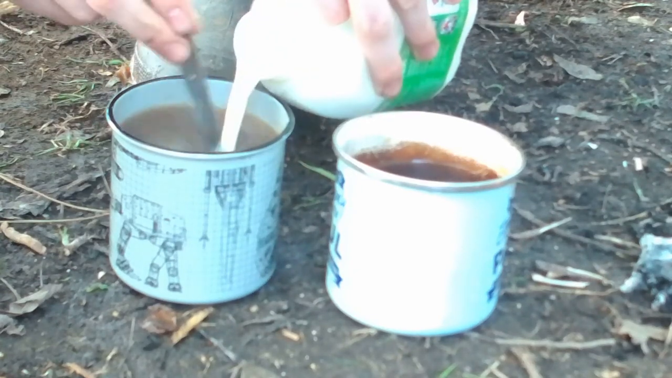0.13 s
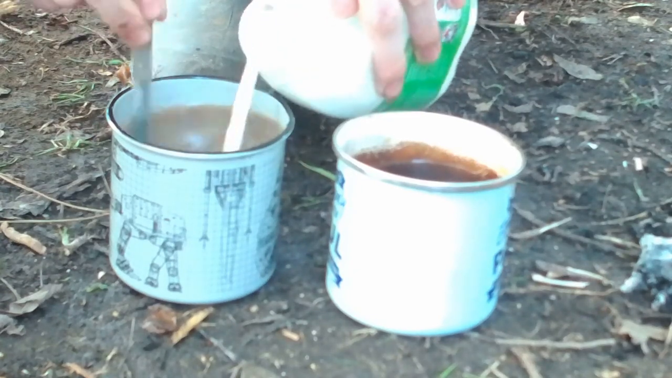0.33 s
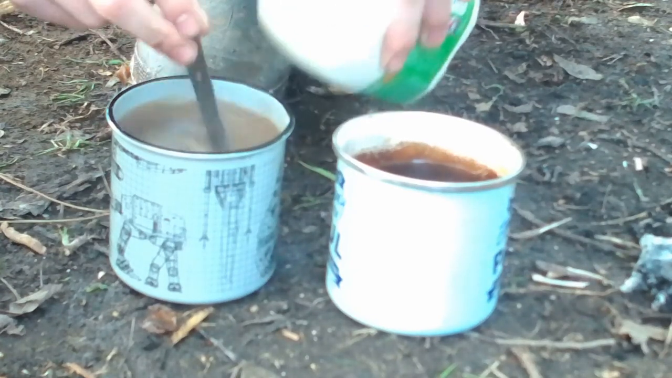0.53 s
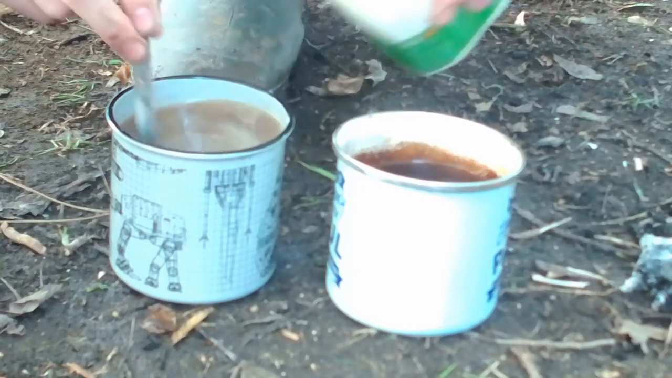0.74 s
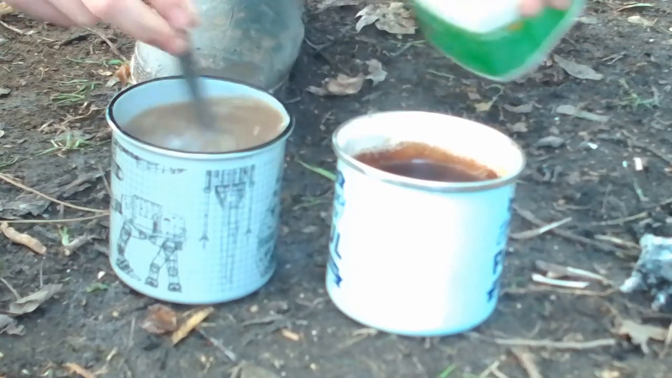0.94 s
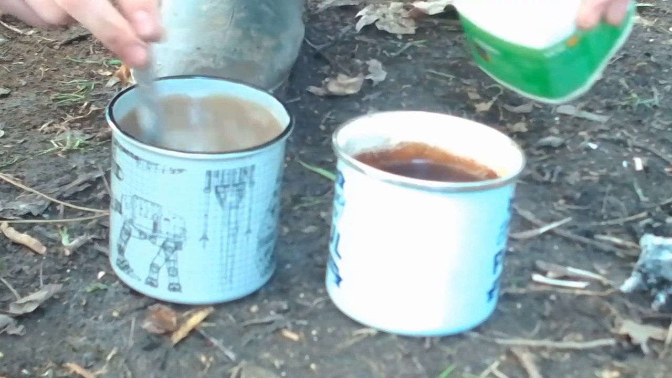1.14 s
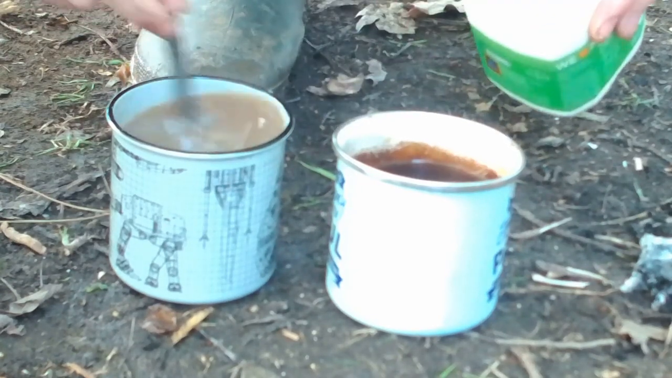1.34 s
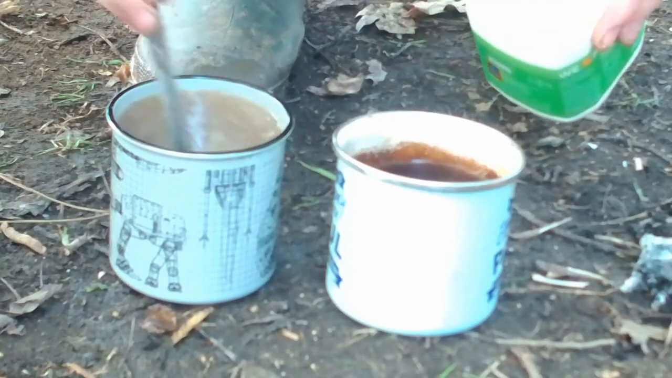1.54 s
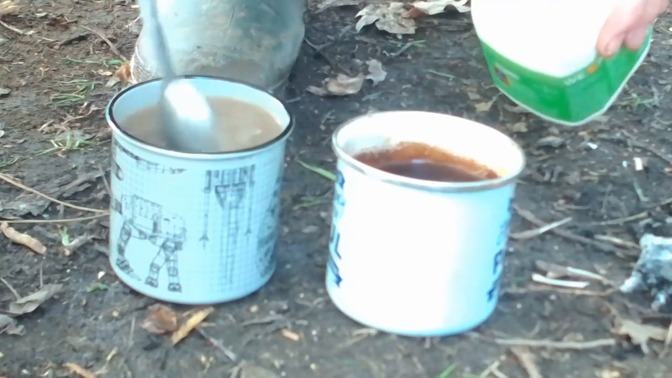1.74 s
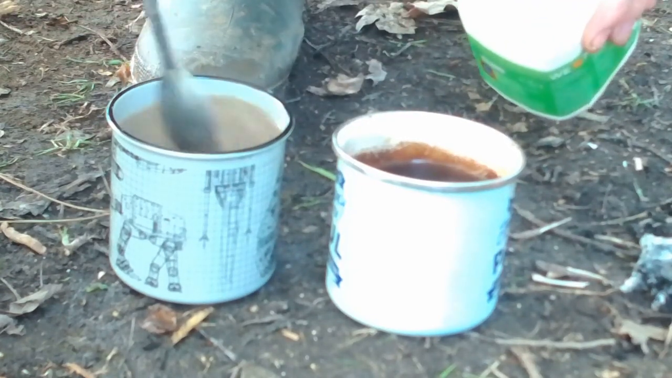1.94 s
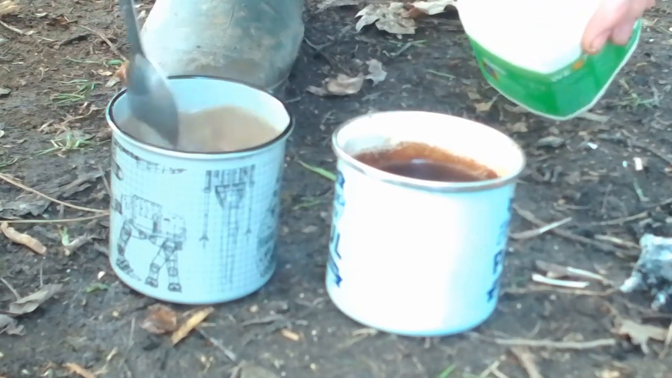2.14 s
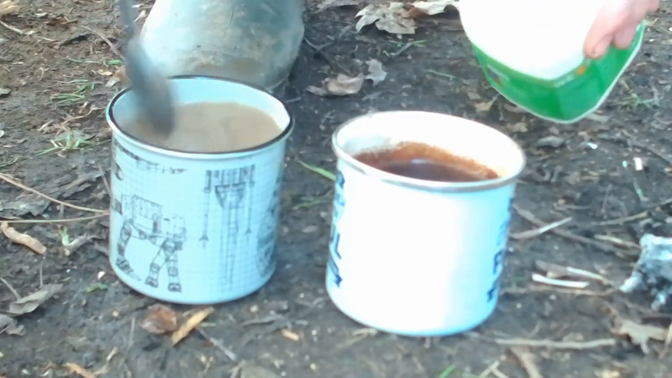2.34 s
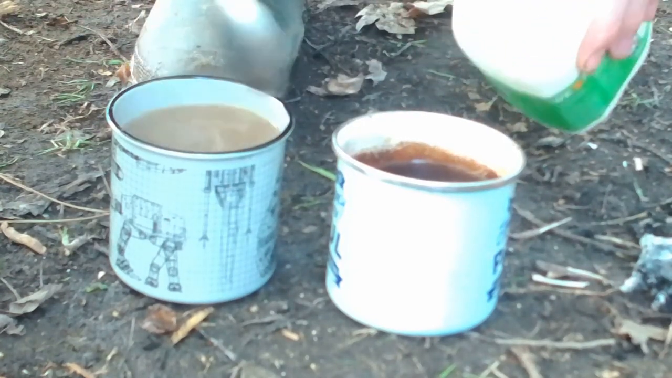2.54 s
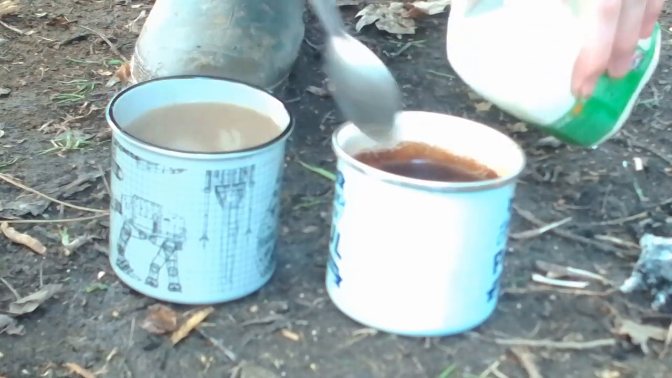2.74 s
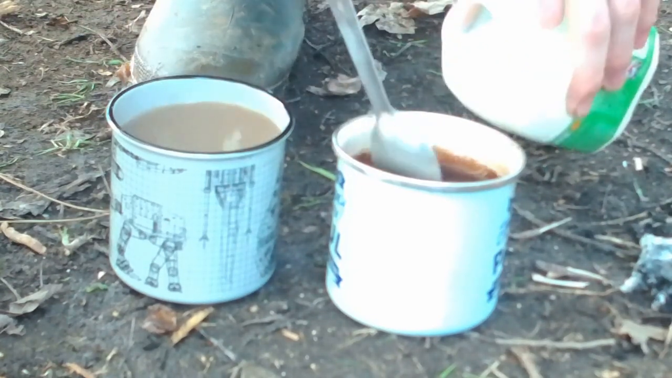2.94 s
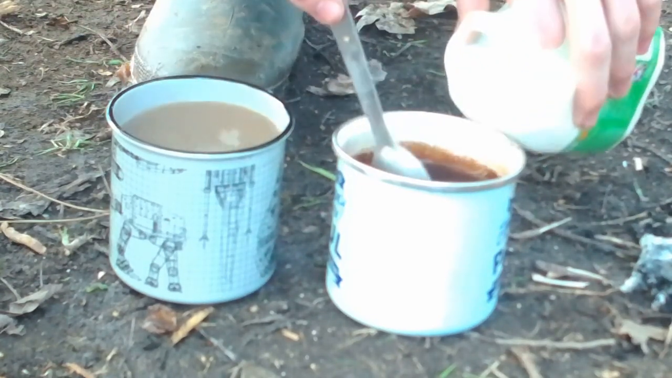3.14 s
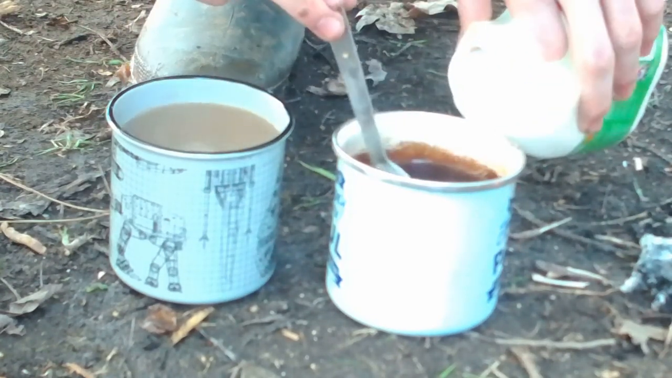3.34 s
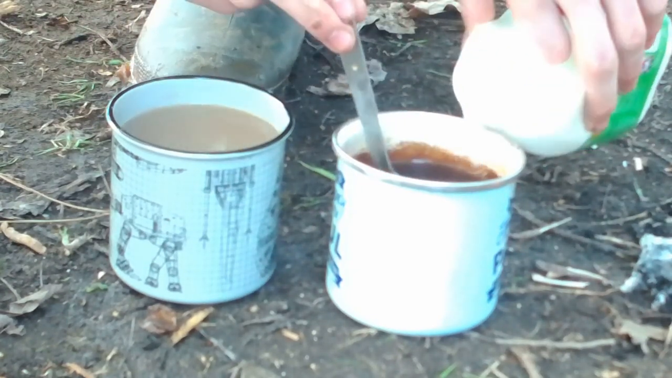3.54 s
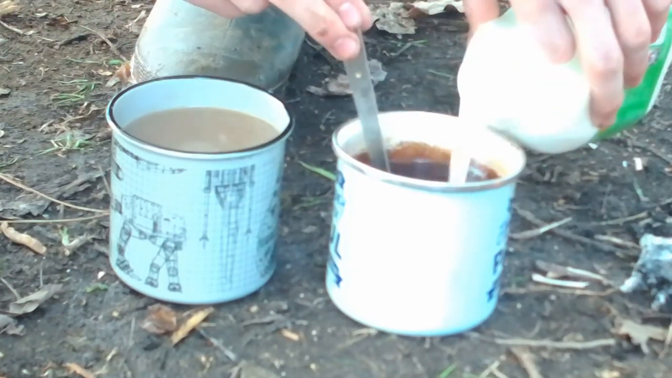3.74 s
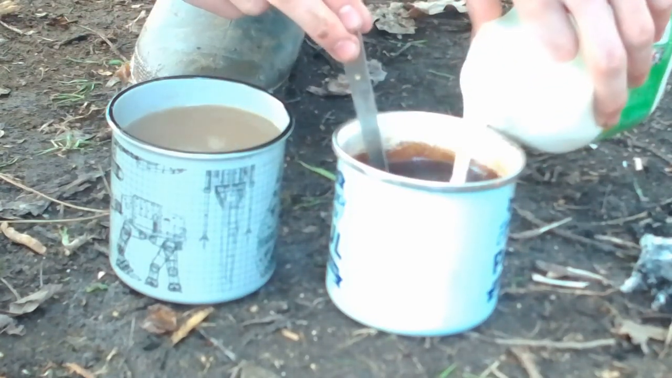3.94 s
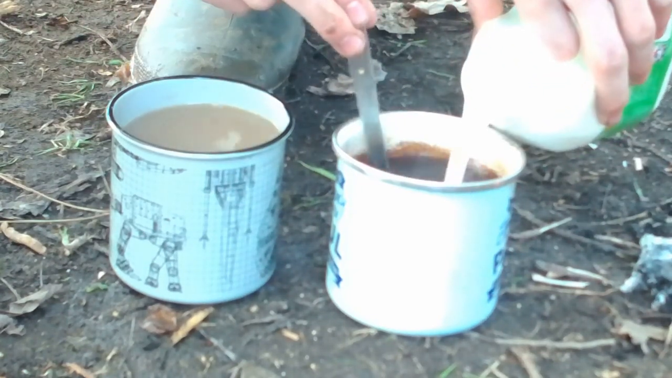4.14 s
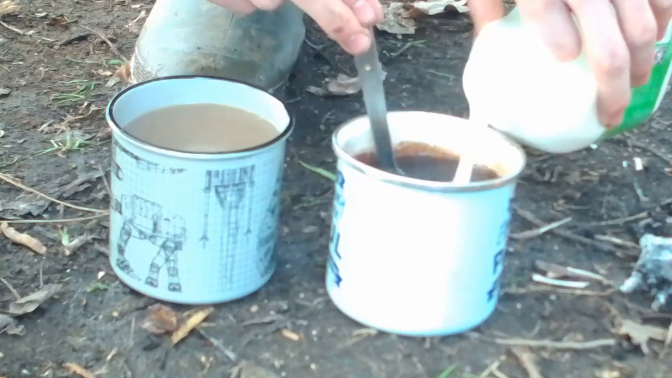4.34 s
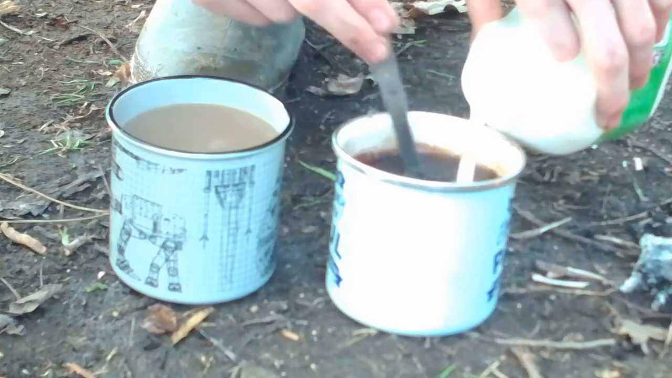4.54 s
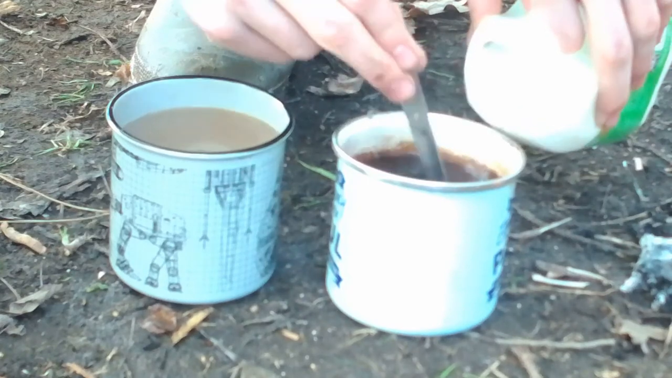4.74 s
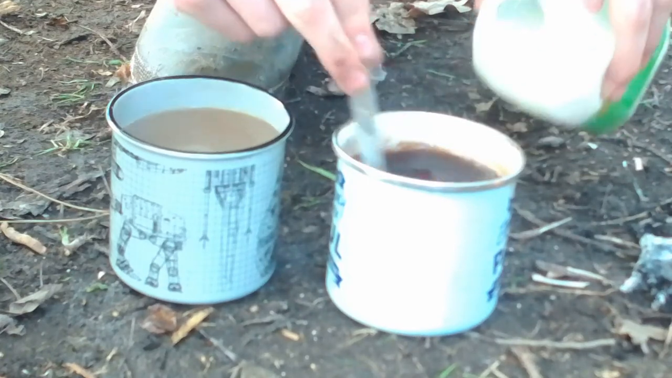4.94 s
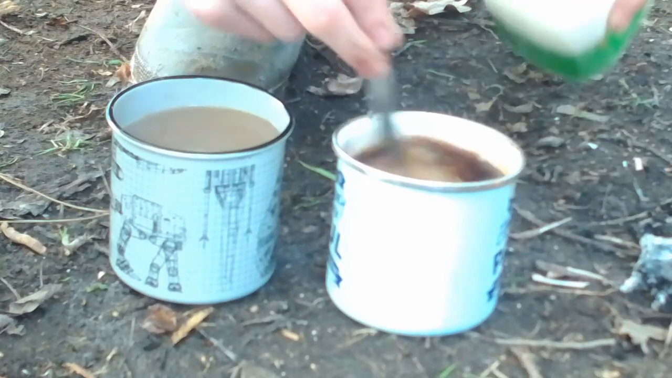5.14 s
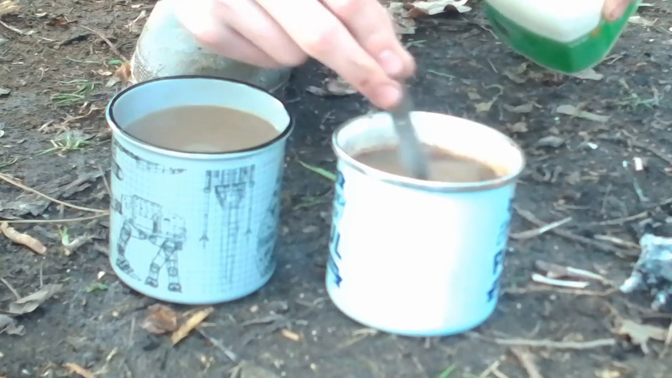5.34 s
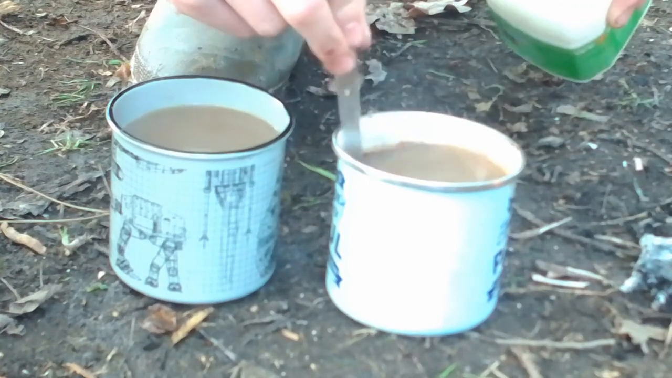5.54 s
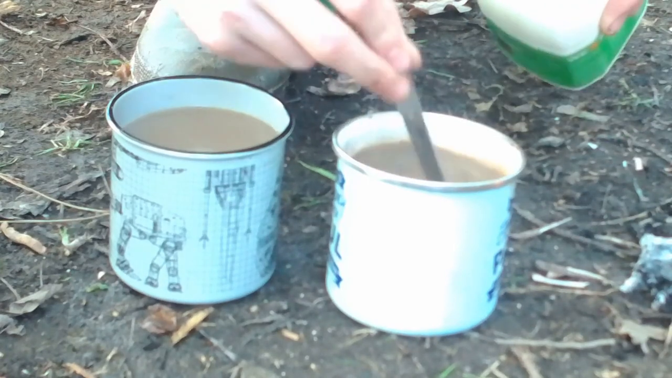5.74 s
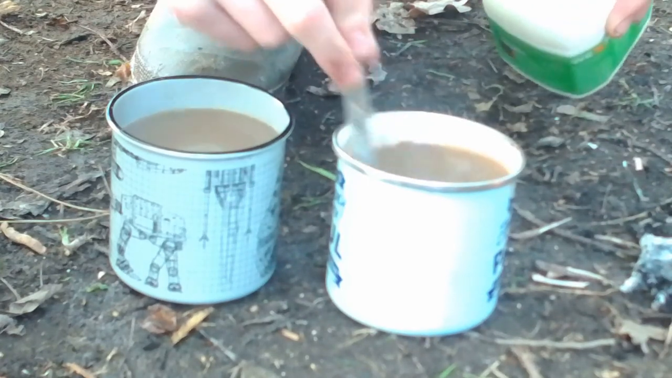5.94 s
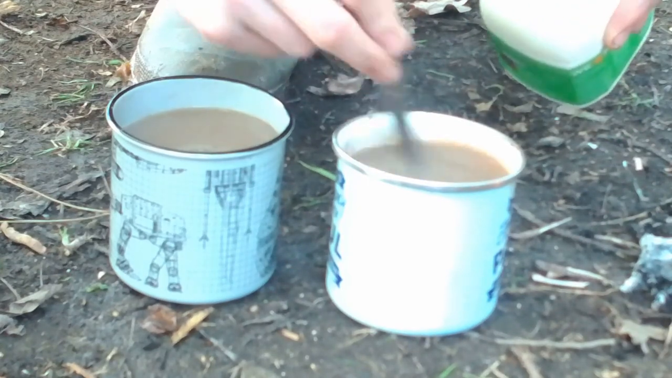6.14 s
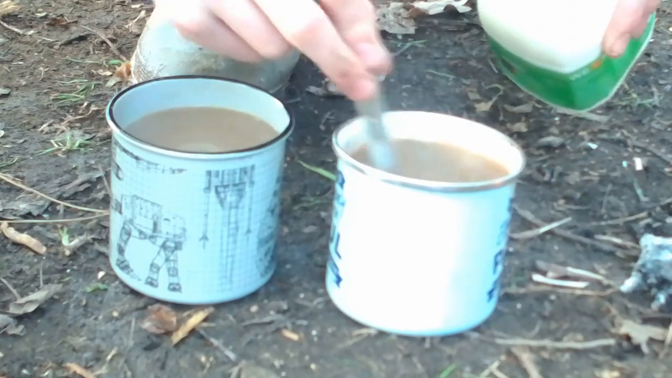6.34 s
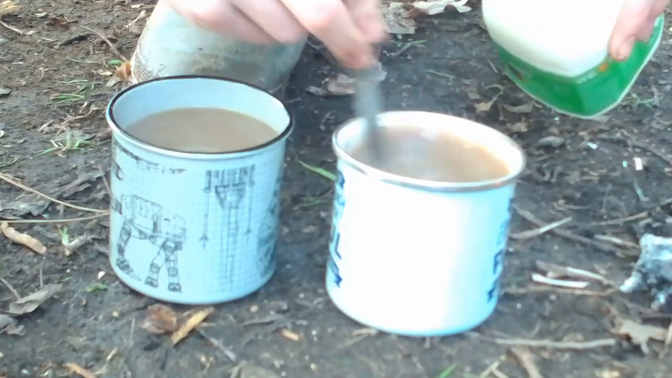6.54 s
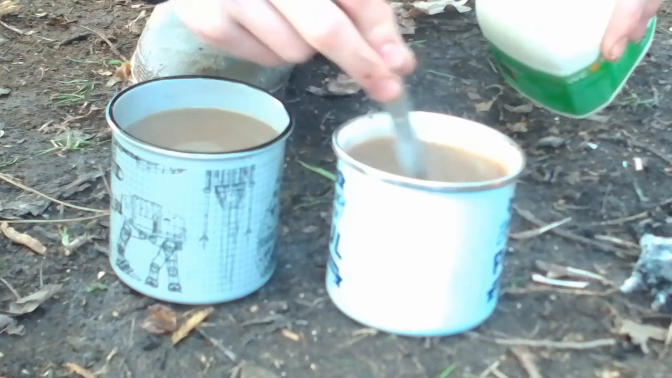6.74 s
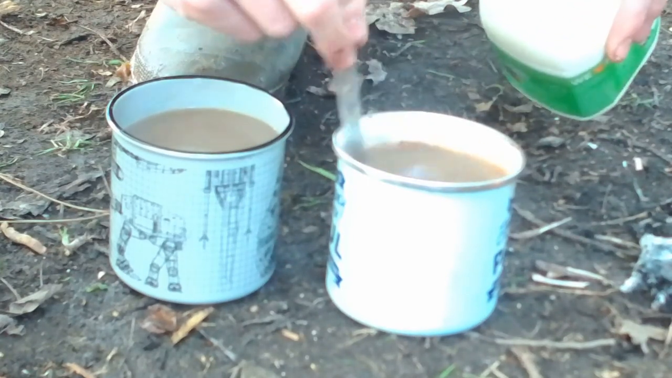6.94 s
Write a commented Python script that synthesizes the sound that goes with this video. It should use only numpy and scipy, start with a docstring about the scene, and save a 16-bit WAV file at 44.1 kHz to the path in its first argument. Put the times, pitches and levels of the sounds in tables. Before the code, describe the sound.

A spoon stirs two full enamel mugs on the ground outdoors, heard very close. The first rings bright and shimmering, with faint milk plips at the start, then sings when tapped freely. A lull holds only soft air, small brittle ticks and one plastic jug knock. Then quick stirring in the second mug gives shorter, duller clinks, some sharp and hard, joined by rough scrapes until the end.

```python
"""A quiet camp in the open, two full enamel mugs on the ground close to the microphone.
Milk trickles in as small ringing bubbles and a steel spoon stirs the first mug: decaying modes for each clink,
filtered noise slips for each scrape. The spoon taps freely, one blow and then a quick cluster of three,
and moves on to clink and scrape round the duller second mug.
The plastic milk jug pops once; dry ticks of short noise, soft air noise and a far engine hum lie around."""
import sys
import numpy as np
from scipy import signal
from scipy.fft import rfft, irfft
from scipy.io import wavfile

SR = 44100
rng = np.random.default_rng(int(sys.argv[2]) if len(sys.argv) > 2 else 0)


def master_out(mix):
    """Clip the mix to full scale and print it as 16-bit PCM to the path in sys.argv[1]."""
    frames = np.transpose(np.atleast_2d(mix))
    ceiling = np.clip(frames, -1, 1)
    pcm = np.round(ceiling * 32767).astype(np.int16)
    wavfile.write(sys.argv[1], SR, pcm)


N = 308259
TIME = np.arange(N) / SR
RING_TIME = TIME[:SR]  # each single sound is computed for one second


def undb(db):
    """Decibels to gain."""
    return 10 ** (np.asarray(db) / 20)


def unit(x):
    """Scale to rms 1."""
    return x / np.sqrt(np.mean(x ** 2))


def unit_attack(x):
    """Scale a hit to rms 1 over its first 20 ms."""
    return x / np.sqrt(np.mean(x[:SR // 50] ** 2))


def curve(rows, axis=1):
    """One column of a table, joined by straight lines in time."""
    rows = np.array(rows)
    return np.interp(TIME, rows[:, 0], rows[:, axis])


def add(out, start_s, x):
    """Mix x into out at start_s."""
    i = max(int(start_s * SR), 0)
    out[i:i + len(x)] += x[:N - i]


def band(x, lo_hz, hi_hz, order=2):
    """Band-pass."""
    edges = [lo_hz, min(hi_hz, SR / 2 - 100)]
    return signal.sosfilt(signal.butter(order, edges, "band", fs=SR, output="sos"), x)


def fade(t60):
    """Exponential decay, falling 60 dB in t60 seconds."""
    return np.exp(-np.log(1000) * RING_TIME / max(t60, 1e-3))


def walk(rate):
    """Slow random drift with rate knots a second, spread near 1."""
    knots = np.arange(0, N / SR + 1, 1 / rate)
    return np.interp(TIME, knots, rng.standard_normal(len(knots)))


def ring(modes, length=1, pitch=1, scatter_db=0, detune=0, load_slope=0, twin=0, swirl=0):
    """Decaying modes, optionally with twins split off by the handle; each contact can vary them a little."""
    chance = rng.standard_normal((len(modes), 3))
    # the drink circles about four times a second and bends the pitch
    circling = np.sin(8 * np.pi * RING_TIME + 2 * np.pi * rng.random())
    clock = RING_TIME + swirl * circling / (8 * np.pi)
    out = np.zeros(SR)
    for (hz, db, t60), (size, shift, side) in zip(modes, chance):
        loaded = pitch ** ((3400 / hz) ** load_slope)  # the drink's mass lowers the low modes most
        phase = 2 * np.pi * hz * loaded * (1 + detune * shift) * (clock - clock[0])
        tone = np.sin(phase)
        if twin:
            tone = tone + twin * np.sin(phase + 2 * np.pi * 9.5 * RING_TIME)  # 9.5 Hz beat
        out += np.sign(side) * undb(db + scatter_db * size) * fade(t60 * length) * tone
    return out


# edges of the six mode families: base, body, bell, rim, edge, sparkle [f/Hz]
FAMILY_HZ = [350, 1200, 2650, 3600, 4550, 5650, 13000]
# a blow nearer the rim feeds the rim family and starves the bell family [share of the place dB, per family]
PLACE_SHARE = [0.13, 0.23, -0.81, 0.99, 0.13, 0.47]
# the spoon, lifted out, taps freely and the mug sings [from t/s, to t/s]
FREE_TAPS_S = (1.8, 2.5)
# change of ring on a free tap [level/dB, per family]
FREE_TAP_DB = [4, -6, 1.5, -4.5, 5.5, -0.5]
PIVOT_HZ = 3480  # a harder contact tilts the ring upward about this pitch
MUFFLE_T60_S = 0.97  # extra decay of the base family outside the free taps


def clinks(rows, modes, family_db, tuning, detune, swirl, scatter_db, load_slope,
           crack_t60, tail_db, tail_t60):
    """Each blow rings the mug anew, with a crack of dense noise and a faint outdoor tail.
    Hardness tilts the mode families; the place struck trades bell against rim."""
    out = np.zeros((len(family_db), N))
    pitch = curve(tuning)
    for start_s, strength_db, hardness_db, place_db, crack_db, length, *beating in rows:
        i = int(start_s * SR)
        free = FREE_TAPS_S[0] < start_s < FREE_TAPS_S[1]
        out[1:, i:i + SR] *= fade(0.05)[:N - i]  # contact stops the earlier ring, but the base family sings on
        noise_shape = undb(crack_db) * unit_attack(fade(crack_t60)) + undb(tail_db) * fade(tail_t60)
        for k, (lo, hi) in enumerate(zip(FAMILY_HZ, FAMILY_HZ[1:])):
            family = [mode for mode in modes if lo <= mode[0] < hi]
            octaves = np.log2(np.sqrt(lo * hi) / PIVOT_HZ)
            db = strength_db + family_db[k] + hardness_db * octaves + place_db * PLACE_SHARE[k]
            twin = beating[0] if beating and k == 2 else 0  # only the bell family beats audibly
            tone = unit_attack(ring(family, length, pitch[i], scatter_db, detune, load_slope, twin, swirl))
            crack = band(band(rng.standard_normal(SR), lo, hi, order=3), 1700, 9700)
            hit = undb(db + FREE_TAP_DB[k] * free) * unit_attack(tone + unit(crack) * noise_shape)
            if k == 0 and not free:
                hit = hit * fade(MUFFLE_T60_S)
            add(out[k], start_s, hit * (1 - fade(0.00077)))  # the ring builds up during the contact
    return out.sum(axis=0)


# ring modes of the thin first mug [f/Hz, level within its family/dB, t60/s before the length factor]
FIRST_MUG = [(403, -15.5, 0.61), (876, 3.5, 1.28), (1103, -5.5, 0.37), (1150, -13, 1.4), (1220, 2, 0.5),
             (1466, 3.5, 0.44), (1666, -7.5, 0.3), (1850, 12, 0.06), (2220, -13, 0.28), (3066, -8, 0.34),
             (3387, 18.5, 0.29), (4140, -4, 0.11), (4137, 14.5, 0.12), (4460, -1, 0.2), (4920, -19, .09),
             (4860, 8, 0.066), (5330, 9.5, 0.14), (6186, 15.5, 0.13), (6870, 5.5, 0.13), (6700, -19, 0.24),
             (7490, 6, 0.11), (8250, -2.5, 0.14), (9500, -1.5, 0.082), (10200, -24, 0.08), (11800, -36, .1)]
# spoon on the first mug [t/s, strength/dB, hardness/dB per octave, place/dB: + rim / - wall,
# crack against ring/dB, ring length factor, share of beating twin mode]
FIRST_CLINKS = [(.36, -23, -1.5, -3.5, -6, 0.41, -0.26), (.511, -23.5, -0.5, -0.5, 2, 1, -0.16),
                (.527, -31, 0.5, -2, 4, 1.4, 0), (.57, -27.5, -2, -0.5, -2, 0.77, -0.15),
                (.601, -34, -1, -7, -5, 0.75, -0.4), (.892, -25.5, -0.5, 5, -5.5, 0.77, -0.56),
                (.967, -31, 0, -2.5, -4, 1.45, 0), (1.227, -22.5, 1.5, -2.5, -3.5, 1.01, -0.59),
                (1.394, -18.5, 1.5, 1.5, -9.5, 0.95, 0.55), (1.473, -20.5, -1, -5.5, -9, 0.92, -0.64),
                (2.006, -9.5, 0, 2.5, -3, 0.87, -0.24), (2.223, -11.5, 1.5, -4, -14.5, 0.44, -0.57),
                (2.24, -21, 1, -6, -16, .8, -0.56), (2.259, -19.5, 1.5, -9, -35, 0.98, 0.21)]
# the swirling drink climbs the wall and flattens the mug until stirring stops [t/s, pitch factor at 3400 Hz]
FIRST_TUNING = [(.36, 1.008), (.6, .992), (1.39, .992), (1.47, .987), (2.0, .999), (2.22, 1.003)]
# how strongly each family rings in an ordinary blow [level/dB, per family]
FIRST_FAMILY_DB = [-16, -14.5, -6.5, -7, -13, -9]


def first_mug():
    """Spoon on the thin enamel, close by: long ringing modes, beating in the bell family."""
    return clinks(FIRST_CLINKS, FIRST_MUG, FIRST_FAMILY_DB, FIRST_TUNING, detune=0.00037, swirl=0.0026,
                  scatter_db=6.0, load_slope=0.38, crack_t60=0.071, tail_db=-33.5, tail_t60=0.83)


# ring modes of the duller second mug [f/Hz, level within its family/dB, t60/s before the length factor]
SECOND_MUG = [(434, -15, 0.35), (940, -2, 0.063), (1110, 0, 0.35), (1677, -7, 0.45), (1797, 2.5, 0.14),
              (1982, -2.5, 0.39), (2271, 8, 0.12), (2376, 1, 0.068), (3020, -8, 0.15), (3060, 3, 0.21),
              (3150, 3.5, 0.067), (3932, -6.5, 0.15), (4005, -14.5, 0.18), (4193, -5.5, 0.11),
              (4210, -9, 0.081), (4770, -3.5, 0.14), (5056, 0, 0.19), (4860, 4, 0.07), (5026, -3.5, 0.095),
              (6220, -6.5, 0.06), (5960, 14, 0.079), (6650, 0, 0.16), (6640, 1.5, 0.02), (7420, 4, 0.1),
              (7810, 6, 0.097), (9700, 2, 0.027), (9660, 1.5, 0.11), (11500, -0.5, 0.055)]
# spoon on the second mug [t/s, strength/dB, hardness/dB per octave, place/dB: + rim / - wall,
# crack against ring/dB, ring length factor]
SECOND_CLINKS = [(4.69, -18.5, 1, 5, -14, 1), (4.73, -19.5, 0, -6.5, 0.5, 0.67),
                 (5.006, -15, -0.5, 10.5, -7.5, 0.68), (5.073, -38, -5, 6, 1, 1),
                 (5.216, -12, 1.5, 2, -1.5, 1), (5.241, -22, -1, -5, 3, 0.45),
                 (5.253, -15, 1.5, 4, -25, 0.64), (5.464, -40, 1, 11, -15, 1), (5.479, -17, 3, 10.5, 0, 1),
                 (5.488, -16, 2, 4.5, -8, 0.59), (5.543, -29, -1, 0, 2, 1), (5.724, -10, 5, 1, -4, 0.73),
                 (5.767, -13, 1, -5, 2.5, 0.3), (5.987, -14.5, 0.5, 5.5, -7, 0.95),
                 (6.1, -40.5, 14.5, -10, 12, 1), (6.147, -25.5, -2, -2, 1, 0.96),
                 (6.181, -28, 3.5, -2, -17, 1), (6.211, -20.5, 0.5, -4, -4, 0.62),
                 (6.333, -28.5, 4, -5.5, -12, 0.75), (6.447, -22.5, 1.5, -3.5, -7, 0.94),
                 (6.541, -24, -2, 5, -11, 0.79), (6.616, -20, 0, -2, -2.5, 1),
                 (6.652, -21, 0.5, -8, -8, 0.44), (6.893, -18.5, 3, 6, -2.5, 0.65),
                 (6.911, -20.5, 1, 2.5, -20, 0.79)]
# the mug sinks steadily as the swirl builds [t/s, pitch factor at 3400 Hz]
SECOND_TUNING = [(4.69, 1.005), (6.9, .9915)]
# how strongly each family rings in an ordinary blow [level/dB, per family]
SECOND_FAMILY_DB = [-20.5, -14.5, -10, -9, -6.5, -13]


def second_mug():
    """Spoon on the duller mug, close by: shorter modes that the drink bends further."""
    return clinks(SECOND_CLINKS, SECOND_MUG, SECOND_FAMILY_DB, SECOND_TUNING, detune=0.0048, swirl=0.0064,
                  scatter_db=4.0, load_slope=1.35, crack_t60=0.044, tail_db=-25, tail_t60=0.74)


# ring modes of the spoon, damped by the fingers: two of the handle, then the bowl [f/Hz, level/dB, t60/s]
SPOON = [(2385, -1.5, 0.17), (2667, 1, 0.12), (4416, -0.5, 0.065), (4640, -2.5, 0.041), (6720, -6, 0.033)]
# blows that make the spoon sing [t/s, handle level/dB, bowl level/dB, pitch factor]
SPOON_RINGS = [(5.004, -37.5, -26.5, 1.03), (5.216, -24.5, -12.5, 1.01), (5.724, -17, -11.5, 1.0)]


def spoon():
    """On three blows at the second mug the steel spoon sings too, handle and bowl."""
    out = np.zeros(N)
    for start_s, handle_db, bowl_db, pitch in SPOON_RINGS:
        handle, bowl = ring(SPOON[:2], pitch=pitch), ring(SPOON[2:], pitch=pitch)
        add(out, start_s, undb(handle_db) * unit_attack(handle) + undb(bowl_db) * unit_attack(bowl))
    return out


def low_pulses():
    """A short low pulse, a few milliseconds long, under the same three blows."""
    out = np.zeros(N)
    for start_s, handle_db, _, _ in SPOON_RINGS:
        add(out, start_s, undb(handle_db - 7.5) * fade(0.007))
    return band(out, 25, 400, order=1)


SCRAPE_ATTACK_S, SCRAPE_EASE_DB_PER_S, SCRAPE_RELEASE_S = 0.015, 16, 0.036


def pressure(scrapes):
    """How hard the spoon bears on the wall: it bites, eases off as it slides on, and lets go."""
    out = np.zeros(N)
    for start_s, length, db in scrapes:
        attack = np.minimum(RING_TIME / SCRAPE_ATTACK_S, 1)
        release = np.exp(-np.maximum(RING_TIME - length, 0) / SCRAPE_RELEASE_S)
        add(out, start_s, undb(db - SCRAPE_EASE_DB_PER_S * RING_TIME) * attack * release)
    return out


def drag(scrapes, resonances, grit_db, grain, shift_db):
    """The spoon catches on the enamel in dense tiny slips; the resonances trade strength as it travels."""
    caught = rng.random(N) < 4000 / SR  # about 4000 slips a second
    slips = rng.standard_normal(N) * caught * undb(grain * np.minimum(rng.exponential(size=N), 3))
    wall = np.zeros(N)
    for hz, width, db in resonances:
        resonance = unit(band(slips, hz - width / 2, hz + width / 2, order=1))
        wall += undb(db + shift_db * walk(4.6)) * resonance
    drifting_time = np.cumsum(1 + 0.009 * walk(12)) / SR
    wall = np.interp(drifting_time, TIME, wall)  # the resonances drift with the swirl
    rub = unit(wall) + undb(grit_db) * unit(band(slips, 2400, 8000, order=1))
    return rub * pressure(scrapes) * undb(2 * walk(40))


# scrapes along the wall of the first mug [start t/s, length t/s, level/dB]
FIRST_SCRAPES = [(0, 0.43, -51), (.59, 0.072, -47), (.84, .06, -49.5), (1.0, 0.1, -45), (1.25, 0.08, -44),
                 (1.48, 0.043, -39)]


def first_scrapes():
    """The sliding spoon excites the first mug's own modes from the bell family up."""
    bands = [(hz, 40, db) for hz, db, _ in FIRST_MUG if hz > FAMILY_HZ[2]]  # each 40 Hz wide
    return drag(FIRST_SCRAPES, bands, grit_db=-7.5, grain=4.9, shift_db=4.5)


# scrapes along the wall of the second mug [start t/s, length t/s, level/dB]
SECOND_SCRAPES = [(4.73, 0.17, -43), (4.95, .08, -39.5), (5.35, 0.061, -40), (5.51, 0.085, -38),
                  (5.78, 0.069, -38), (5.94, 0.17, -38.5), (6.19, .17, -39), (6.4, 0.15, -39),
                  (6.65, 0.075, -32.5), (6.78, 0.22, -44.5), (6.91, 0.087, -38.5)]
# resonances of the second mug under the sliding spoon [f/Hz, width f/Hz, level/dB]
RUB_BANDS = [(1720, 25, -12.5), (2400, 58, -19), (2955, 14, -2), (3120, 78, -4), (4060, 62, -6.5),
             (4870, 73, 4.5), (6200, 43, -8.5), (6860, 42, -3), (7600, 940, -6.5), (9070, 180, -6),
             (11300, 370, -9.5)]


def second_scrapes():
    """The sliding spoon excites narrow and broad resonances of the second mug."""
    return drag(SECOND_SCRAPES, RUB_BANDS, grit_db=-6, grain=5.5, shift_db=5.0)


def bubble(hz, cycles, rise):
    """Trapped air rings for some cycles and rises in pitch as it nears the surface."""
    t60 = cycles / hz
    return np.sin(2 * np.pi * hz * (RING_TIME + rise * RING_TIME ** 2 / t60)) * fade(t60)


# bubbles in the drink [t/s, level/dB, starting f/Hz]
BUBBLES = [(0.0308, -34, 1430), (0.1346, -32, 2420), (.166, -33.5, 2510), (.2124, -30.5, 1800),
           (.2585, -24.5, 2210), (0.2837, -29, 1013), (.292, -28, 1180), (0.316, -33.5, 1200),
           (5.655, -35, 1480)]


def bubbles():
    """Single plips with a fine splash, and the faint trickle of milk as small random bubbles."""
    out = np.zeros(N)
    for start_s, db, hz in BUBBLES:
        splash = unit(band(rng.standard_normal(SR), 2200, 4100, order=1)) * fade(0.024)
        add(out, start_s, undb(db) * (bubble(hz, cycles=61, rise=0.072) + undb(-3.0) * splash))
    for when, height, size in rng.random((13, 3)):
        hz = 1050 * 2.5 ** height
        add(out, 0.21 + 0.13 * when, undb(-34 - 19 * size) * bubble(hz, cycles=113, rise=0.13))
    return out


# modes of the plastic jug [f/Hz, relative level/dB, t60/s]
JUG = [(258, -17, 0.17), (325, -4.5, 0.11), (516, -15, 0.066), (598, -4, 0.054), (713, 4.5, 0.02),
       (1320, -11, 0.016), (1710, -11, 0.014), (1870, -14.5, 0.025), (2630, -22, 0.033)]
# pop of the jug [t/s, level/dB]
JUG_POP = (3.389, -22)


def jug():
    """The wall of the plastic jug snaps through with a hollow knock: short modes and a burst of noise."""
    out = np.zeros(N)
    start_s, db = JUG_POP
    snap = unit(band(rng.standard_normal(SR), 600, 1800, order=1)) * fade(0.044)
    add(out, start_s, undb(db) * (unit_attack(ring(JUG)) + undb(-3.5) * snap))
    return out


# dry ticks [t/s, level/dB, centre f/Hz]
TICKS = [(2.3981, -19, 5600), (3.031, -30.5, 7850), (3.636, -25, 3550), (3.7286, -38, 3960),
         (4.337, -33, 7600), (6.2827, -27, 5150)]


def ticks():
    """Tiny brittle snaps of noise a few milliseconds long, each with a faint tail."""
    out = np.zeros(N)
    for start_s, db, hz in TICKS:
        noise = band(rng.standard_normal(SR), hz / 2.0, hz * 2.5, order=1)
        snap = unit(band(noise, 2000, 8200))
        add(out, start_s, undb(db) * snap * (fade(0.0088) + undb(-27) * fade(0.16)))
    return out


# fundamental of the far engine [t/s, level/dB]
HUM = [(0, -65), (2.2, -60.5), (3.7, -67.5), (4.1, -77)]
# its second and third harmonics [level/dB]
HUM_OVERTONE_DB = [-64, -61]
HUM_HZ, HUM_WAVER_DB = 102.5, 1.5


def engine():
    """A far engine hums: three harmonics of one drifting pitch, each wavering in level."""
    phase = 2 * np.pi * np.cumsum(HUM_HZ * (1 + 0.01226 * walk(6))) / SR
    out = np.zeros(N)
    for k, db in enumerate([curve(HUM), *HUM_OVERTONE_DB], 1):
        out += np.sin(k * phase) * undb(db + HUM_WAVER_DB * walk(5))
    return out


# colour of the open air [f/Hz, relative level/dB per Hz]
AIR = [(15, -61), (25, -47), (69, -22), (92, -10.5), (125, -11), (200, -6), (273, -7), (303, -8.5),
       (383, -6.5), (772, -6.5), (1080, -4.5), (1200, -9), (2690, -15), (8420, -19.5), (12400, -22),
       (16200, -76), (22000, -120)]
AIR_DB = -48.5  # rms level before the waver


def open_air():
    """Soft air: noise coloured in the spectrum, wavering a little."""
    hz, db = np.transpose(AIR)
    bins_hz = np.arange(N // 2 + 1) * SR / N
    colour = undb(np.interp(np.log(bins_hz + 1), np.log(hz), db))
    air = unit(irfft(rfft(rng.standard_normal(N)) * colour, N))
    return air * undb(AIR_DB + 0.4 * walk(3.09))


def scene():
    """Both mugs and the small sounds close to the microphone, the engine far off in open air."""
    mugs = first_mug() + second_mug() + spoon() + first_scrapes() + second_scrapes()
    near = band(mugs + bubbles() + ticks(), 140, SR / 2)  # small things radiate almost no bass
    popped = band(jug(), 300, 9000, order=4)
    return (near + popped + low_pulses() + engine() + open_air())[None]


TOP_HZ = 12750


def record(dry):
    """Peaks past full scale are clipped flat; the top is then cut steeply."""
    clipped = np.clip(dry, -1, 1)
    return signal.sosfilt(signal.ellip(10, .2, 70, TOP_HZ, fs=SR, output="sos"), clipped)


dry = scene()
out = record(dry)
master_out(out)
```